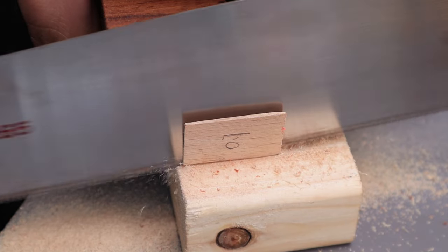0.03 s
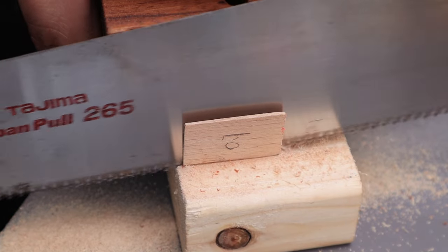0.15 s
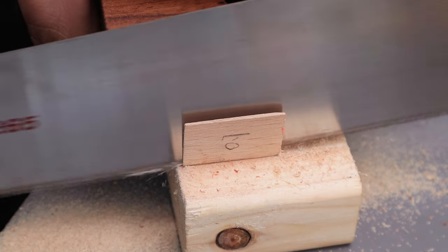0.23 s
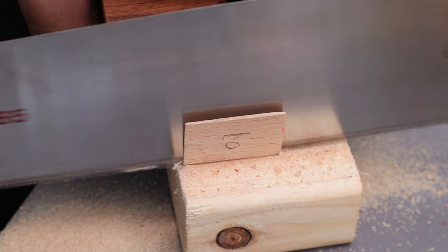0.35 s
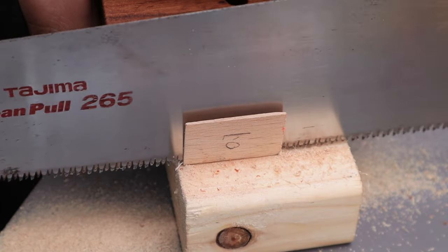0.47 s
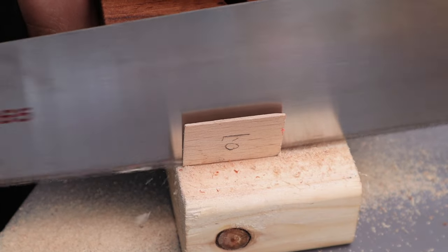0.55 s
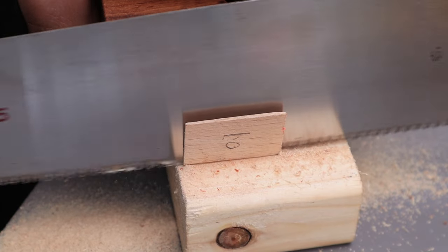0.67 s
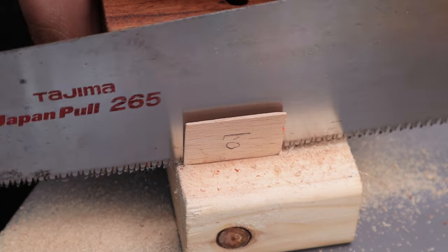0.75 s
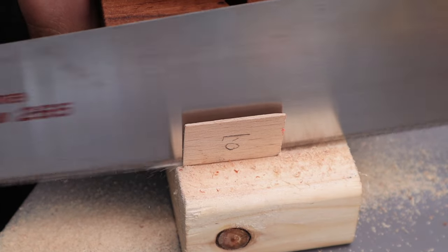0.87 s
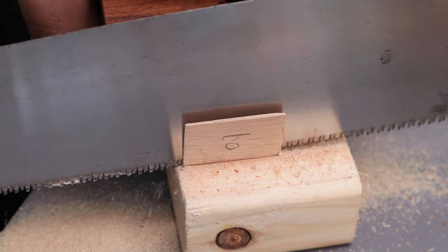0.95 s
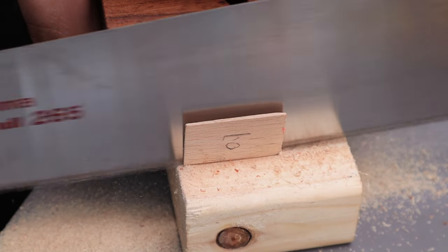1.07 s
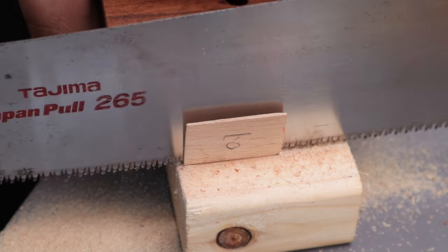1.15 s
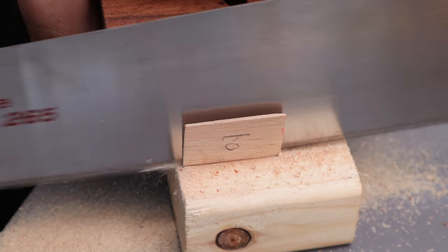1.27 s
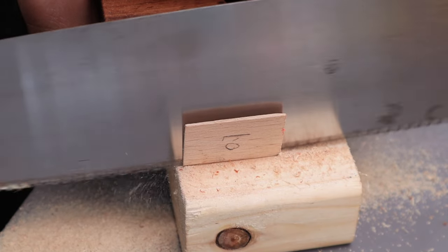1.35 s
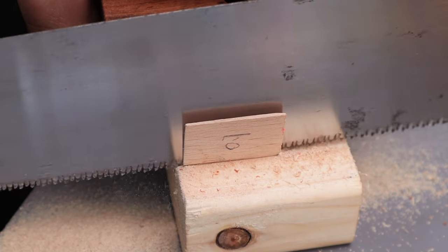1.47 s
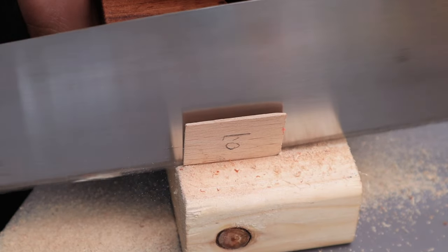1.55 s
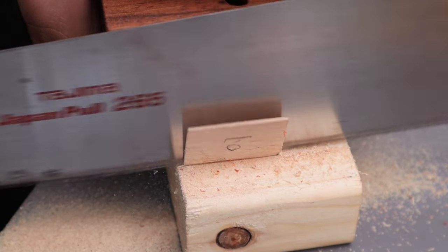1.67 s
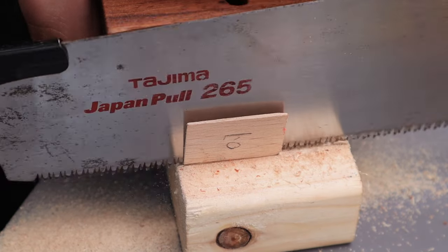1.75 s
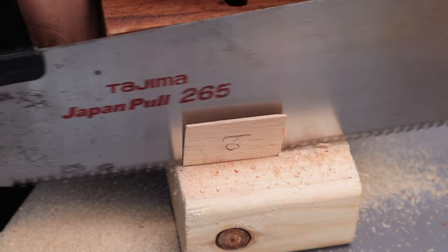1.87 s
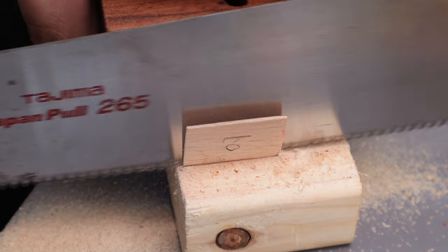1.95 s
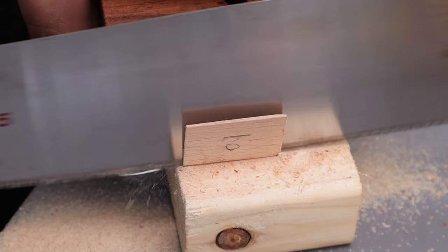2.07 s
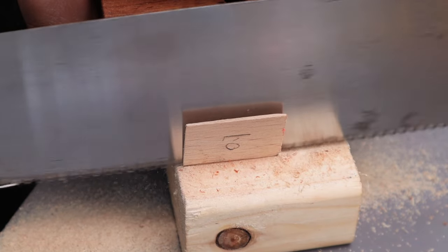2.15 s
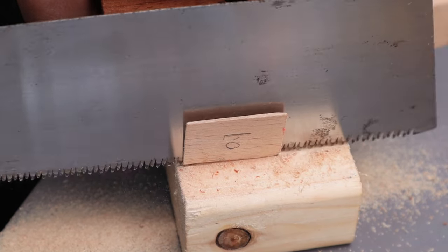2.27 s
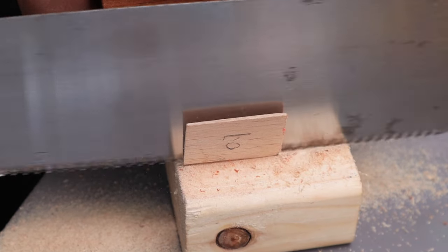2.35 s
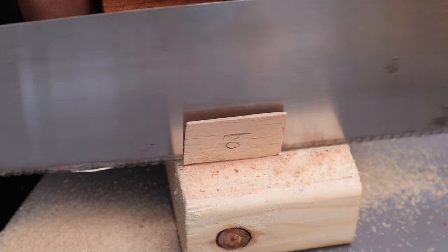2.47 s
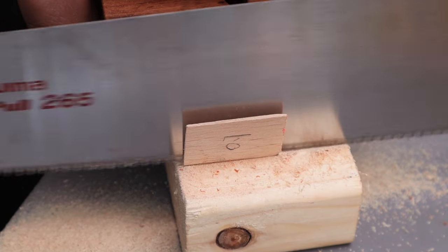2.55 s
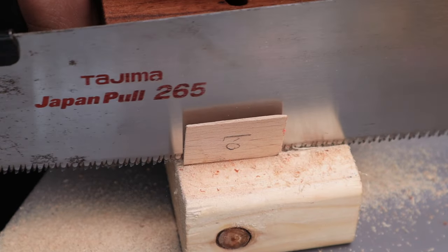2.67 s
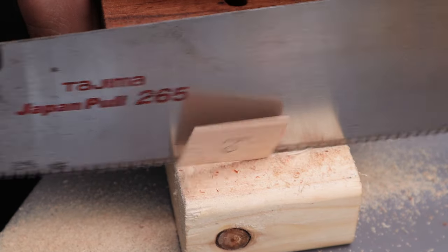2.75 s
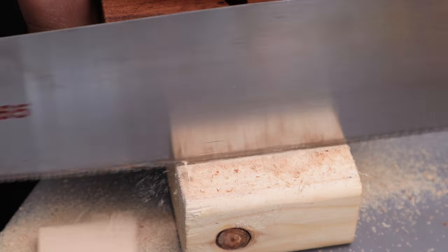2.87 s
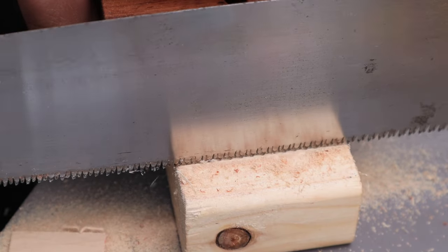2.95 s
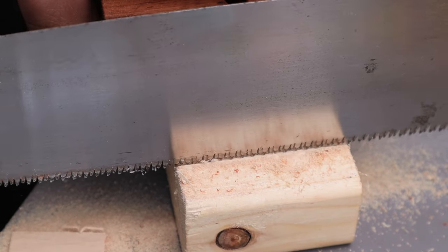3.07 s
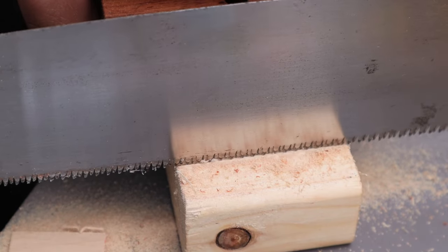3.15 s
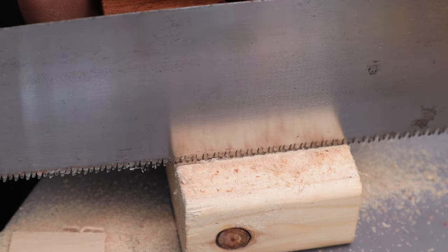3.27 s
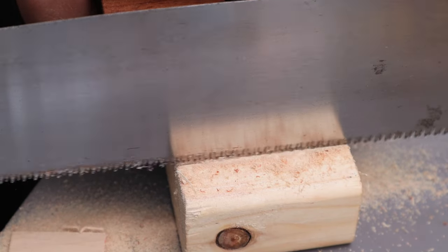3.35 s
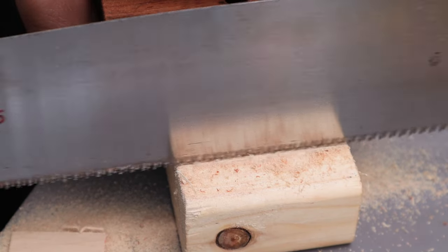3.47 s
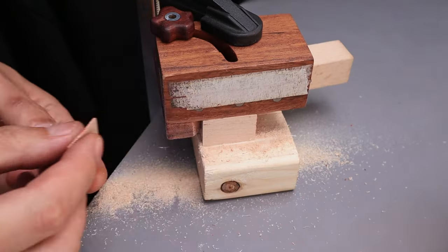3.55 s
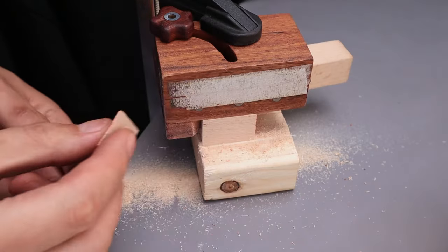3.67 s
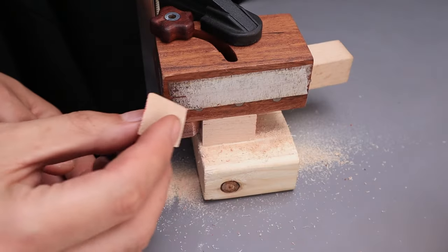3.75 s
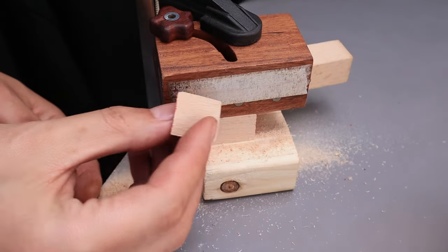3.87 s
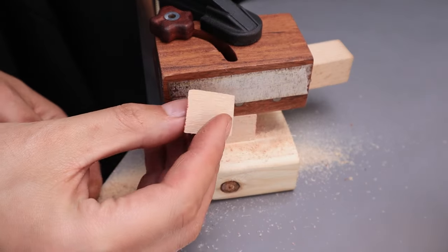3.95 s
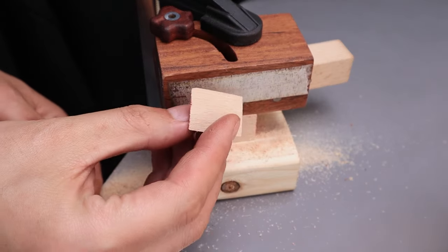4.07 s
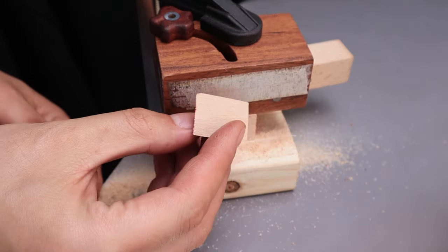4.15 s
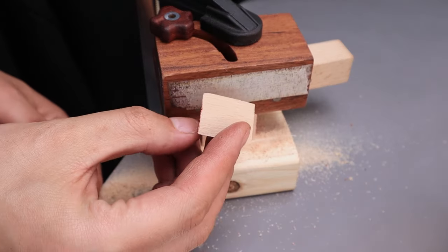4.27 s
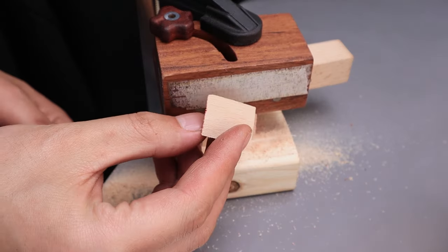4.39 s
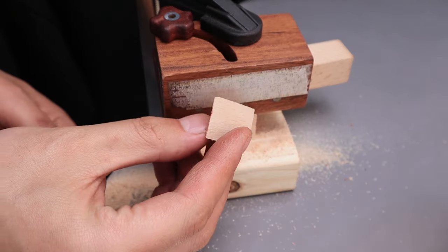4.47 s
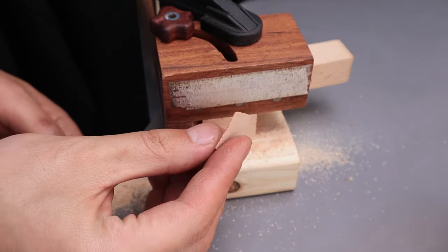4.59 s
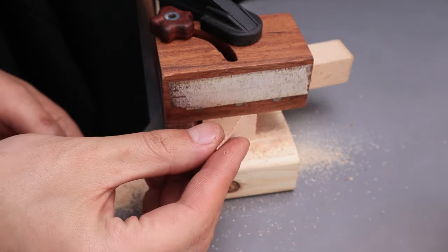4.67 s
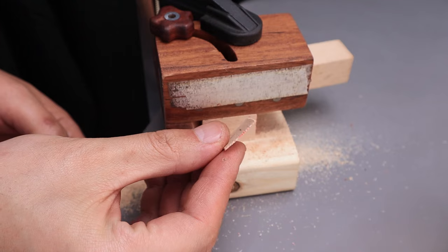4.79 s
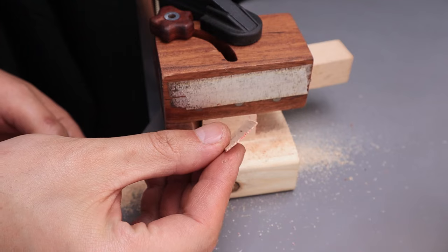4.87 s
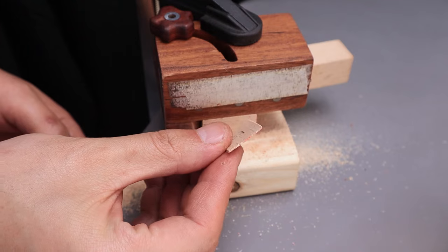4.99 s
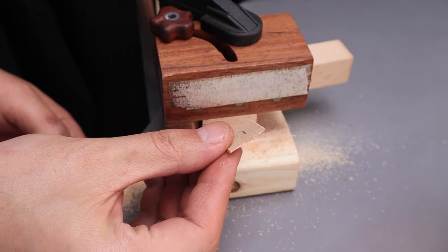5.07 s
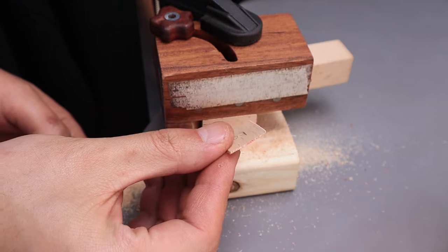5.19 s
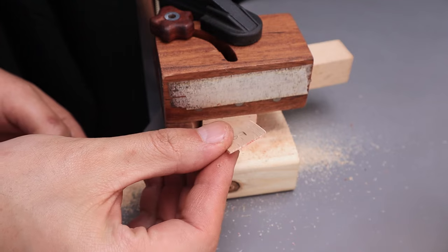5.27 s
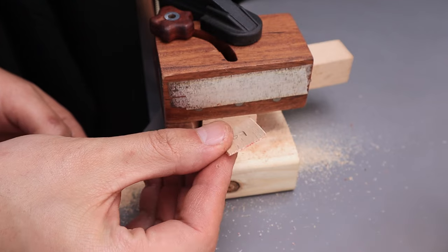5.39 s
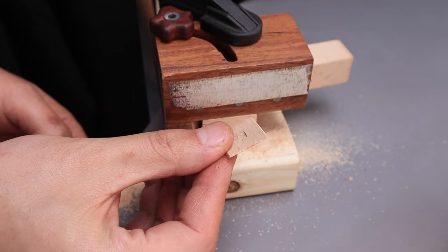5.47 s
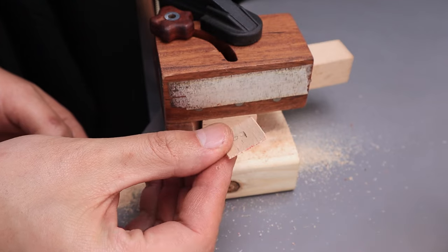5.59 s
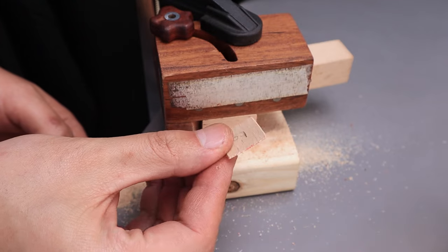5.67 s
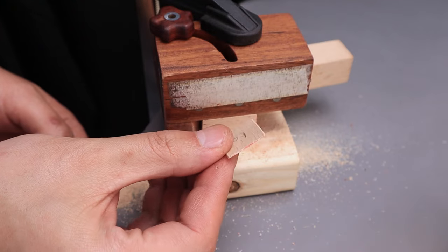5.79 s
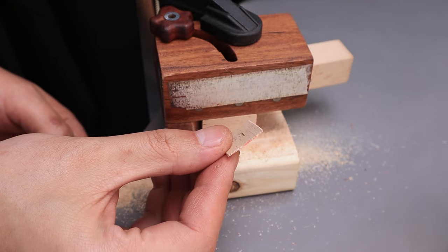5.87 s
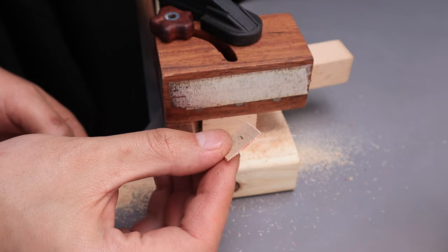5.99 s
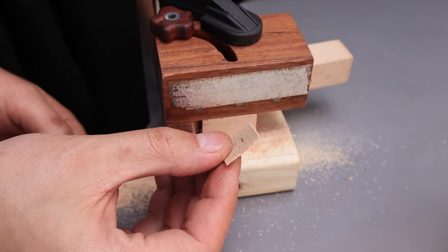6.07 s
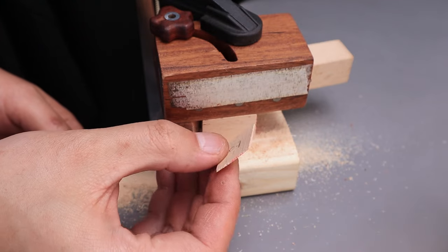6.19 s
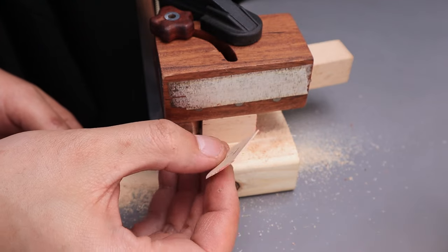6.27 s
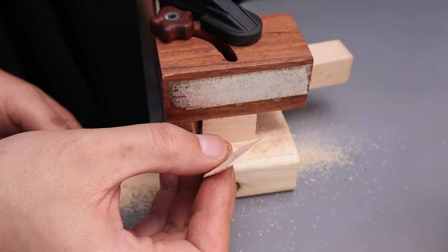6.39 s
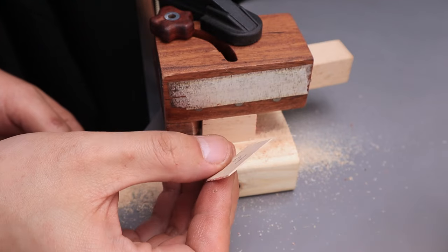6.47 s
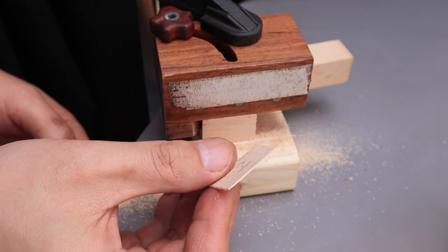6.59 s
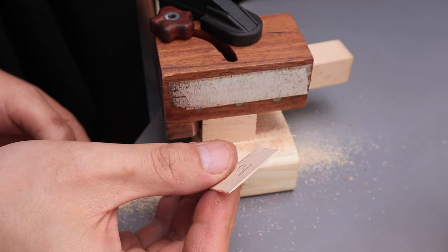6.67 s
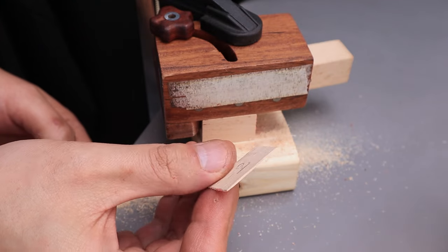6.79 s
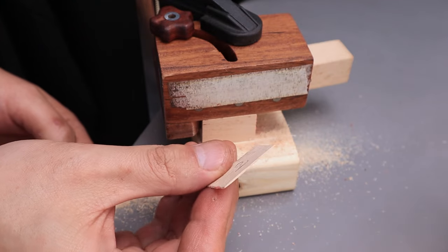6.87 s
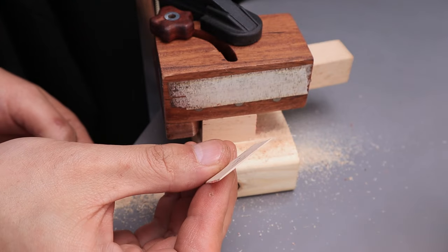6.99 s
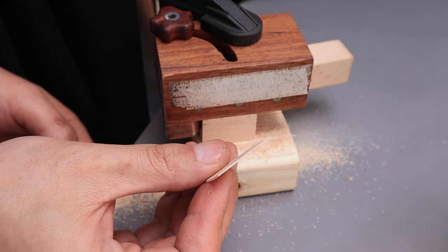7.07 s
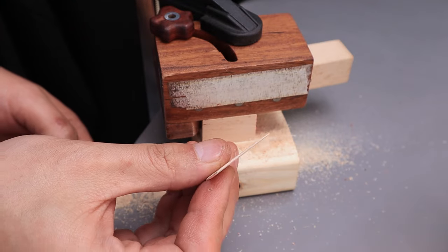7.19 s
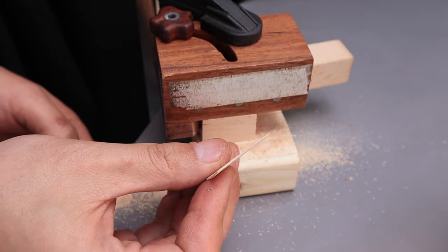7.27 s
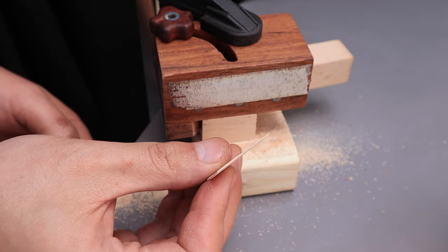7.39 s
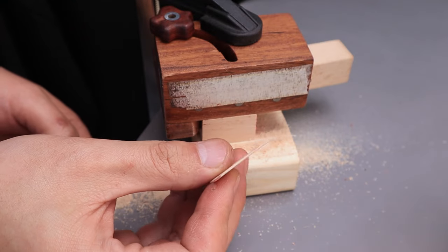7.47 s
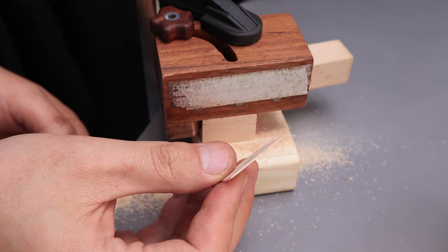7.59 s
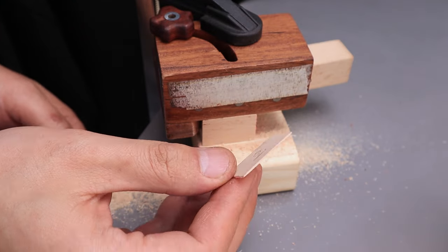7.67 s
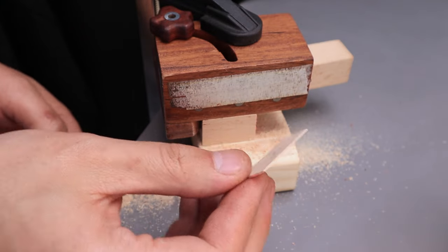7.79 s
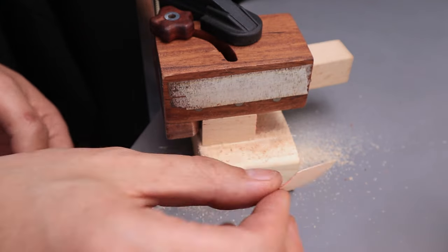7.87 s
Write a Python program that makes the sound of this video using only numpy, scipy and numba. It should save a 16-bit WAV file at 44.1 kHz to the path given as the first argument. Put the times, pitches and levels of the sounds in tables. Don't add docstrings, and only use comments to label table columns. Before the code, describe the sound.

Heard very close and dry, a fine-toothed saw works a wooden block on a bench. From 0 to 1.3 s short push and pull strokes come about six per second, each a swelling rasp with midrange woody singing, bright steel hiss and a low bench hum; a bench knock stands out near 0.5 s. From 1.3 s strokes grow longer and slower, with a sharp crack at 1.86 s. Around 2.7 and 2.9 s the blade catches with harsh, high shrieking snaps; cutting ends near 3.1 s. After a pause, a light metallic-woody tick at 3.48 s and a faint short scrape stop at 3.6 s. Then quiet room rumble and mic hiss remain, with tiny clicks and faint skin rubs on thin wood, clearest at 4.85, 6.25, 6.4 and 7.7 s. Outside, a small bird gives faint falling whistles from 3.7 to 7.3 s, with a clearer low peep at 6.26 s.

```python
import sys
import numpy as np
from scipy import signal
from scipy.fft import rfft, irfft
from scipy.io import wavfile
from scipy.ndimage import uniform_filter1d
from numba import njit

SR = 44100
rng = np.random.default_rng(int(sys.argv[2]) if len(sys.argv) > 2 else 0)


def undo_db(level):
    steps = np.asarray(level, float) / 20
    return 10 ** steps


def int16_out(signal):
    q = np.round(np.clip(np.atleast_2d(signal).T, -1, 1) * 32767)
    wavfile.write(sys.argv[1], SR, q.astype(np.int16))


N = 350154
TIME = np.arange(N) / SR


def level(x, db):
    return x * undo_db(db) / np.sqrt(np.mean(x ** 2))


@njit
def svf(x, hz, width):
    y, b, l = np.empty(len(x)), 0., 0.
    g, k = np.tan(np.pi * hz / SR), width / hz
    for i in range(len(x)):
        v = (b + g * (x[i] - l)) / (1 + g * (g + k))
        b, l, y[i] = 2 * v - b, l + 2 * g * v, k * v
    return y


def svf_twice(x, hz, width):
    return svf(svf(x, 1. * hz, 1. * width), 1. * hz, 2. * width)


def walk(rate_hz, size=N):
    hold = int(SR / rate_hz)
    steps = np.repeat(rng.standard_normal(size // hold + 1), hold)
    return uniform_filter1d(steps, hold)[:size]


def ring(x, modes, shift_db):
    out = np.zeros(len(x))
    for k, (hz, width_hz, db) in enumerate(modes):
        gain = undo_db(db + shift_db * walk(36, size=len(x)))
        out += (-1) ** k * gain * svf(x, 1. * hz, 1. * width_hz)
    return out


def colour(x, points):
    size = 4096
    hz, db = np.transpose(points)
    bin_hz = np.fft.rfftfreq(size, 1 / SR)
    log_gain = np.interp(np.log(bin_hz + 1), np.log(hz), db) * np.log(10) / 20
    fold = np.r_[1, 2 * np.ones(size // 2 - 1), np.zeros(size // 2)]
    response = irfft(np.exp(rfft(irfft(log_gain) * fold)))
    return signal.fftconvolve(x, response)[:len(x)]


def tearing(scatter_db, patchy_db, rate_hz, size=N):
    scatter = scatter_db * rng.exponential(size=size)
    return rng.standard_normal(size) * undo_db(scatter + patchy_db * walk(rate_hz, size=size))


def echo(x, t60_s, wet_db):
    t = TIME[:SR // 2]
    tail = rng.standard_normal(len(t)) * undo_db(-60 * t / t60_s)
    return x + signal.fftconvolve(x, level(tail, wet_db) / np.sqrt(len(t)))[:N]


def bumps(t, rows):
    return sum(db * np.exp(-((t - s) / length_s) ** 2) for s, length_s, db in rows)


# [Hz, dB per Hz]
AIR_SPECTRUM = [(18, -30), (34, -3), (56, -9), (71, -16), (450, -31.5), (800, -29.5), (1500, -40.5),
                (16200, -41)]
AIR_DB = -63.5


def air():
    still = level(colour(rng.standard_normal(N), AIR_SPECTRUM), AIR_DB)
    rumble = svf(still, 40., 60.)
    street = svf(still, 850., 400.) * 0.26 * undo_db(2.2 * walk(10))
    return still + street + rumble * (undo_db(3 * walk(3)) - 1)


# t/s, length/s, from f/Hz, to f/Hz, level/dB
BIRD_SLIDES = [(3.74, 0.05, 7960, 7260, -78.5), (4.191, 0.13, 8050, 6570, -79.5),
               (4.681, .125, 7920, 5970, -77), (5.151, 0.13, 7710, 5540, -78), (4.76, .07, 6800, 5200, -80),
               (5.22, .06, 5800, 5100, -79), (4.25, .06, 7400, 6300, -79), (5.756, 0.11, 7400, 5640, -80),
               (6.61, .11, 7870, 7000, -79.5), (6.707, .065, 6500, 6190, -76),
               (6.981, 0.14, 8330, 9010, -87), (7.13, .12, 8300, 7730, -81)]
# t/s, level/dB
BIRD_PEEPS = [(3.875, -75), (4.299, -69), (5.25, -67), (5.86, -73.5), (6.261, -64)]
PEEP_S, PEEP_FROM_HZ, PEEP_TO_HZ = 0.075, 4520, 4300
BEND = 1.6


def bird():
    out, warble = np.zeros(N), walk(350)
    peeps = [(s, PEEP_S, PEEP_FROM_HZ, PEEP_TO_HZ, db) for s, db in BIRD_PEEPS]
    for start, length_s, from_hz, to_hz, db in BIRD_SLIDES + peeps:
        near = slice(int(start * SR), int((start + length_s) * SR))
        part = np.clip((TIME[near] - start) / length_s, 0, 1)
        glide_hz = from_hz + (to_hz - from_hz) * part ** BEND
        phase = 2 * np.pi * np.cumsum(glide_hz * (1 + 0.034 * warble[near])) / SR
        out[near] += undo_db(db) * np.abs(np.sin(np.pi * part)) ** .5 * np.sin(phase)
    return echo(out, t60_s=0.21, wet_db=5.5)


# t/s, peak level/dB, f/Hz, width/Hz, t60/s
TICKS = [(1.96, -54, 8210, 120, 0.18), (3.656, -45, 1373, 1392, 0.015), (3.77, -50.5, 1500, 1350, 0.013),
         (4.489, -52, 9000, 9000, 0.0069), (5.724, -47, 9015, 9000, 0.0065), (6.109, -51, 150, 200, 0.22),
         (6.108, -47.5, 310, 300, 0.15), (6.108, -62.5, 900, 580, 0.077), (6.245, -63.5, 1740, 350, 0.074),
         (6.108, -58, 4020, 2510, .015), (6.385, -60.5, 1560, 140, 0.17), (6.403, -55, 1580, 250, 0.073),
         (7.385, -55, 130, 144, .15), (7.385, -53.5, 730, 400, .1), (7.402, -56.5, 670, 398, 0.076),
         (3.66, -45.5, 910, 1500, 0.02), (2.428, -43, 2000, 3030, .012), (3.484, -43, 1100, 86, 0.053),
         (3.484, -37, 1810, 140, 0.071), (3.483, -34.5, 2422, 280, .03)]
# t/s, peak level/dB, f/Hz
BENCH_JOLTS = [(.17, -27.5, 545), (.845, -24.5, 680), (.99, -24, 135), (1.185, -25, 669), (1.189, -28, 126),
               (1.745, -27, 1041), (2.05, -36, 110.2), (2.2, -29.5, 1110), (2.54, -25.5, 384),
               (2.3, -25, 379.2), (.525, -14.5, 265), (0.591, -26.5, 194), (0.679, -24, 121),
               (.70, -24.5, 390), (1.066, -26.5, 392.8), (1.45, -21, 340), (1.66, -20.5, 381),
               (1.82, -23.5, 115), (1.86, -22.5, 195), (2.69, -21.5, 380), (2.76, -29.5, 999.3),
               (3.019, -23.5, 389.5), (1.31, -30.5, 50)]
JOLT_WIDTH_HZ, JOLT_T60_S = 27, 0.2


def ticks():
    out, t = np.zeros(N), TIME[:SR // 4]
    jolts = [(*jolt, JOLT_WIDTH_HZ, JOLT_T60_S) for jolt in BENCH_JOLTS]
    for s, db, hz, width_hz, t60_s in TICKS + jolts:
        burst = rng.standard_normal(len(t)) * undo_db(-60 * t / t60_s)
        hit = svf_twice(burst, hz, width_hz)
        out[int(s * SR):][:len(t)] += undo_db(db) * hit / np.abs(hit).max()
    return out


# f/Hz, width/Hz
SLICE_MODES = [(13650, 1000), (10300, 610), (7350, 300)]
# f/Hz, width/Hz
PINCHED_MODE = (13150, 350)
# peak t/s, rise/s, fall/s, top mode level/dB, step down per lower mode/dB
SQUEAKS = [(4.85, .024, 0.087, -59, 20), (5.07, 0.043, .04, -74, 15), (5.21, 0.016, .014, -71, 17.5),
           (6.25, 0.03, 0.057, -79, -8), (6.261, 0.0026, 0.0055, -47, -1), (6.4, 0.022, 0.024, -45, 5.5),
           (6.543, .016, .014, -54, 23), (7.637, .0032, .003, -44.5, 22.5), (7.64, 0.018, .047, -61, 23),
           (7.735, 0.02, 0.039, -82.5, -12.5), (7.94, 0.023, .012, -57.5, 5)]
# peak t/s, rise/s, fall/s, level/dB, f/Hz
EDGE_SLIPS = [(3.648, .016, 0.024, -58.5, 11970), (3.656, 0.035, 0.0088, -50, 10380),
              (3.841, 0.0031, 0.01, -62, 8896), (3.843, .003, .008, -63, 14000),
              (4.51, .0032, .0055, -61.5, 11940), (5.163, .002, .006, -57.5, 13000),
              (5.333, .003, .006, -62.5, 12880), (7.735, 0.016, .039, -36, 14100),
              (7.74, 0.017, .024, -55, 6950), (7.78, 0.021, .04, -49.5, 14130)]
# peak t/s, rise/s, fall/s, level/dB, f/Hz
FACE_BRUSHES = [(3.61, .004, .012, -60, 3500), (3.64, .015, .015, -62, 1300),
                (7.75, .025, 0.051, -73, 4300), (6.3, .06, .1, -70, 11000), (4.9, .05, .05, -75, 8000),
                (5.05, .05, .05, -72, 12500), (7.397, .016, .016, -68, 8000),
                (3.478, 0.012, .004, -54, 7000), (3.65, 0.022, .012, -68, 5970),
                (3.69, 0.022, 0.045, -67, 10980), (3.8, 0.041, 0.029, -69, 9900),
                (3.89, .054, .033, -69.5, 10760), (4.131, 0.019, .02, -70, 11500),
                (4.84, 0.0066, 0.073, -61, 11300), (6.253, 0.014, .011, -53.5, 12370),
                (6.4, .02, .02, -56.5, 10100), (6.542, .01, .012, -63.5, 9050),
                (7.395, .014, 0.016, -69, 2790), (7.395, 0.014, .016, -68, 5020),
                (7.398, 0.016, 0.017, -63, 12470), (7.638, 0.0034, .011, -62, 7500),
                (7.76, 0.034, 0.055, -61, 8100)]
SLIP_WIDTH, BRUSH_WIDTH = .12, .65


def fingers():
    grit = tearing(scatter_db=2.5, patchy_db=2.5, rate_hz=140)
    rubs = []
    for s, rise_s, fall_s, db, step_db in SQUEAKS:
        modes = SLICE_MODES if s > 6 else [PINCHED_MODE] + SLICE_MODES[1:]
        for k, (hz, width_hz) in enumerate(modes):
            rubs.append((s, rise_s, fall_s, db - k * step_db, hz, width_hz))
    rubs += [(*row, SLIP_WIDTH * row[-1]) for row in EDGE_SLIPS]
    rubs += [(*row, BRUSH_WIDTH * row[-1]) for row in FACE_BRUSHES]
    out = np.zeros(N)
    for s, rise_s, fall_s, db, hz, width_hz in rubs:
        near = slice(int((s - 3 * rise_s) * SR), int((s + 3 * fall_s) * SR))
        t = TIME[near] - s
        swell = np.exp(-(t / np.where(t < 0, rise_s, fall_s)) ** 2)
        out[near] += level(svf_twice(grit[near], hz, width_hz), db) * swell
    return out


# t/s, wood peak level/dB, steel peak level/dB, steel f/Hz
SNAGS = [(0.129, -26, -22, 11000), (0.329, -22, -17, 11000), (0.498, -20, -17, 11000),
         (0.667, -19, -13, 11000), (0.832, -16, -9, 12500), (0.978, -17, -9, 12500),
         (1.158, -19, -16, 11000), (1.376, -18, -12, 12000), (1.64, -24, -22, 11000),
         (1.857, -10, -4, 10500), (1.883, -32, -22, 13000), (1.989, -30, -20, 12500),
         (1.999, -24, -14, 12000), (2.429, -39, -36, 13000), (2.457, -48, -35, 12800),
         (2.478, -36, -32, 12500), (0.642, -36, -32, 9000), (0.959, -24, -20, 11000),
         (1.617, -36, -32, 9000), (2.687, -15, -7, 11500), (2.692, -17, -11, 11500),
         (2.719, -18, -5, 12500), (2.877, -36, -32, 10500), (2.894, -24, -16, 11000),
         (2.9, -28, -15, 12500), (2.903, -28, -13, 12500), (2.907, -17, -20, 12000),
         (2.909, -20, -3, 12300), (2.913, -22, -9, 12500), (2.926, -22, -11, 12000),
         (3.482, -19.5, -25, 9500)]
# f/Hz, width/Hz, level/dB
SNAG_WOOD = [(1900, 600, 0), (3800, 900, -3), (6500, 2500, -9)]
# f/Hz, level/dB, t60/s
FREE_BLADE_RING = [(1900, 0.27, 0.025), (4062, 0, 0.11), (5800, -6.5, 0.09), (6408, -14.5, 0.073),
                   (7000, -8, 0.022), (8400, -5.5, 0.041), (8660, -5, 0.036), (11105, -15, 0.03)]
CRACK_T60_S, FREE_CRACK_T60_S, STEEL_WIDTH_HZ = .006, .017, 5000
SAW_STOPS_S = 3.604


def snags():
    out, t = np.zeros(N), TIME[:SR // 10]
    free_ring = FREE_BLADE_RING + [(1160, -4, 0.069), (3361, -3.5, 0.059)]
    for s, wood_db, steel_db, steel_hz in SNAGS:
        noise = rng.standard_normal(len(t))
        if s > SAW_STOPS_S - .2:
            crack = noise * undo_db(-60 * t / FREE_CRACK_T60_S)
            body = sum(undo_db(db) * svf(crack, 1. * hz, 3.8 / t60_s) for hz, db, t60_s in free_ring)
            body = body + 0.21 * svf(svf(crack, 5000., 8000.), 3300., 7000.)
            body = body - .9 * svf(body, 600., 900.)
        else:
            crack = noise * undo_db(-60 * t / CRACK_T60_S)
            body = sum(undo_db(db) * svf_twice(crack, hz, width_hz) for hz, width_hz, db in SNAG_WOOD)
            body = np.roll(body, 30)
        steel = svf(crack, 1. * steel_hz, 1. * STEEL_WIDTH_HZ)
        hit = undo_db(wood_db) * body / np.abs(body).max() + undo_db(steel_db) * steel / np.abs(steel).max()
        out[int(s * SR):][:len(t)] += hit
    return out


# start t/s, hardest t/s, end t/s, block level/dB, roundness of swell
STROKES = [(-.09, -0.017, 0.083, -22, 1.52), (0.097, 0.196, 0.29, -21.5, 3.03),
           (0.294, 0.371, 0.46, -23, 2.1), (0.463, 0.534, 0.62, -21.5, 4.1), (0.629, 0.694, 0.8, -22, 4.5),
           (0.792, 0.849, 0.93, -20, 3.17), (0.949, 1.036, 1.102, -22, 1.42),
           (1.128, 1.195, 1.299, -20, 3.3), (1.34, 1.441, 1.591, -22.5, 1.62),
           (1.611, 1.759, 1.9104, -21.5, 1.6), (1.965, 2.244, 2.395, -24.5, 1.39),
           (2.463, 2.703, 2.84, -26.5, 1.32), (2.871, 2.975, 3.13, -24.5, 1.66),
           (3.474, 3.579, 3.68, -43.5, 0.8)]
TURN_S = 0.0057


def stroke_index(t):
    return np.clip(np.searchsorted(np.array(STROKES)[:, 0], t) - 1, 0, None)


def stroke(t, values):
    held = np.array(values, float)[stroke_index(t)]
    return uniform_filter1d(held, int(TURN_S * SR), axis=0)


# full-speed teeth f/Hz, regular share/dB, then scrape, blade, bench level/dB re block
BITES = [(221.8, -9.5, -4, 3.5, -3.5), (265, 0, -7, 1, -0.5), (259.1, -8.5, -7, 1, -5),
         (264.8, -3, -5.5, 0, -0.5), (258.1, -9, -5.5, 2.5, -3.5), (274.2, -2, -5.5, 2, -4),
         (388, -7.5, -4, 2.5, -5.5), (330, -9, -6.5, -0.3, -1.5), (329, -5.5, -6.5, 1.5, -6.5),
         (270.7, 8.5, -6.5, 2, -1.5), (373.6, -1, -6.5, 1, -6.5), (195, 12, -7, 1, -6.5),
         (380, -3, -6, -2.5, -12), (300, -21.5, -8.5, -3, -19)]
# t/s, length/s, level/dB
SURGES = [(0.18, .015, 2), (0.56, 0.017, 1), (0.851, .015, 0.8), (1.199, 0.011, 2.5), (1.402, 0.022, 2),
          (1.758, 0.012, 1.5), (2.082, 0.068, -2), (2.18, 0.021, 0.5), (2.284, 0.035, 1), (2.555, 0.027, 2),
          (2.78, .03, -1), (2.98, .03, 0.4), (3.507, .014, -3.5), (3.536, 0.013, 1.5), (3.593, .01, 1.5)]
# t/s, length/s, level/dB
FLARES = [
    (1.396, .03, 2.5),
    (1.784, .025, 4),
    (1.888, .004, 2),
    (2.0, .006, 4.5),
    (2.287, .04, 2.5),
    (2.69, 0.0073, 7),
    (2.72, 0.015, 12.5),
    (2.908, .018, 9),
]
BLADE_LEAN_DB = (-4, 2.5)
BENCH_LEAN_DB = (-3, 10.5)
# after-ring level/dB, time constant/s, first-catch level/dB
LINGER = [
    (-11.5, 0.019, -14),
    (-18, .021, -16.5),
    (-21.5, 0.01, -12.5),
    (-5.5, 0.036, -13),
]
FASTEST_LATE = (1.6, 1.01)
SLOWEST = (.6, .72)
KERF_DB = [0.5, -0.5, -2, 1.5, -1, -0.3, 2.5, -2.5, 0, -0.85, -1.5, 0, -0.94, 1]
DEEP_DB = [-11, -9, -8, -8.5, -9, -6, -8, -7, -7.5, -8, -5, -6, -4, -0.5]
CATCH_S, CREEP_DB = 0.021, -37.5
EVEN_LOSS_DB = 42


def effort(t):
    k, turn = stroke_index(t), int(TURN_S * SR)
    start, hardest, end, db, roundness = np.array(STROKES)[k].T
    teeth_hz, even_db, scrape_db, blade_db, bench_db = np.array(BITES)[k].T
    db = db + bumps(t, SURGES)

    before, after = (t - start) / (hardest - start), 1 + (t - hardest) / (end - hardest)
    part = np.clip(np.where(t < hardest, before, after) / 2, 0, 1)
    swell = np.abs(np.sin(np.pi * part)) ** roundness
    catch = (t < hardest) * (1 - swell) * (1 - np.exp(-((t - start) / CATCH_S) ** 2))
    swell = swell + undo_db(CREEP_DB - 260 * np.clip(t - STROKES[-2][2], 0, .3))

    late = part ** np.take(FASTEST_LATE, k % 2)
    speed = np.abs(np.sin(np.pi * late))
    slowest = np.where(late < .5, *SLOWEST)
    hz = uniform_filter1d(teeth_hz * (slowest + (1 - slowest) * speed), turn)
    even = undo_db(even_db - EVEN_LOSS_DB * (1 - speed))

    blade_db = blade_db + np.take(BLADE_LEAN_DB, k % 2) * (part - .5) + bumps(t, FLARES)
    bench_db = bench_db + np.take(BENCH_LEAN_DB, k % 2) * (part - .5)
    levels_db = []
    for body_db, (ring_db, ring_s, catch_db) in zip((0, scrape_db, blade_db, bench_db), LINGER):
        drive = uniform_filter1d(undo_db(db + body_db) * (swell + undo_db(catch_db) * catch), turn)
        keep = np.exp(-1 / (ring_s * SR))
        after_ring = np.abs(signal.lfilter([1 - keep], [1, -keep], drive))
        levels_db.append(20 * np.log10(np.abs(drive) + undo_db(ring_db) * after_ring + 1e-9))
    block_db, *others = levels_db
    return block_db, *(o - block_db for o in others), hz, even, np.take(KERF_DB, k), stroke(t, DEEP_DB)


# f/Hz, width/Hz, level/dB
BENCH_MODES = [(42, 60, -23.5), (122, 19, -11), (141, 22, -10.5), (204, 20, -4.5), (265, 10, 1),
               (328.5, 18, -3.5), (383, 36, -5), (460, 41, -16.5)]
BOOM_DB = [-4, -1, -2, -2, 2, 0, 0, 0, 0, 0, -5, -2, -1, -8]
# f/Hz, width/Hz, level/dB
DEEP_MODES = [(535, 30, -5.5), (596, 80, -5.5), (670, 30, 0), (736, 35, -4), (859, 40, -6), (957, 32, -3.5)]
# f/Hz, width/Hz, level/dB
KERF_MODES = [(1704, 94, -3.5), (1807, 110, -0.5), (1896, 110, 0.5), (2012, 94, 0), (2114, 100, -0.5),
              (2227, 160, -7.5)]
# f/Hz, width/Hz, level/dB
BLOCK_MODES = [(1070, 160, -5), (1189.4, 120, -3.5), (1313, 130, -1), (1430, 120, -3.5), (1558, 150, -4.5),
               (2610, 400, -8)]
FACE_DB = [0, 0, 0, -3, 1, 0, 0, 0, 1, 1, 1.5, 0, 0.5, 0]
# [Hz, dB per Hz]
SCRAPE_SPECTRUM = [(1530, -28.5), (2600, -3.5), (2910, -6), (4040, -2), (5470, -6.5), (8800, -5.5),
                   (11700, -32), (19800, -120)]
# [Hz, dB per Hz]
BLADE_SPECTRUM = [(4710, -47), (8200, -14), (9380, -2), (11100, -6.5), (12900, -2.5), (14600, -6),
                  (15700, -9.5), (16200, -22.5)]
# f/Hz, width/Hz, level/dB
BLADE_MODES = [(9500, 600, -10), (10100, 400, -11), (12600, 330, -4.5), (13043, 380, -7), (13700, 450, -6)]
# f/Hz, width/Hz
GRIP_MODES = [(9000, 900), (9950, 810), (11000, 800), (11900, 700), (12750, 800), (13600, 910)]
GRIP_DB = [(0, 2, -1, 2, -2, 0), (-2, 1, -3, -1, 0, -1), (1, 1, -2, -1, -4, 0), (-2, 1, -4, 1, 2, 0),
           (-1, -1, -3, 0, 0, 0), (0, 1, 0, 1, 1, 2), (0, 0, -2, 2, 1, 0), (0, 1, 0, 0, 0, 0),
           (-1, -3, -2, -1, 1, -4), (-2, -2, -4, 0, 3, -4), (-6, -3, -3, -2, 3, -4), (-4, -4, -2, 2, 3, -4),
           (-1, 0, -1, 5, -1, 0), (0, 0, 0, 0, 0, 0)]
SAW_SIZE = int(3.7 * SR)
SHAKE_DB, SHAKE_HZ, SHAKE_ENDS_S = -57, 65, 3.2


def saw():
    t = TIME[:SAW_SIZE]
    lifted = t > 3.4
    block_db, scrape_db, blade_db, bench_db, hz, even, kerf_db, deep_db = effort(t)
    phase = 2 * np.pi * np.cumsum(hz * (1 + .03 * walk(60, size=SAW_SIZE))) / SR
    bite = 1 + 0.087 * np.clip(even, 0, 1) * np.cos(phase)
    fibres = bite * tearing(scatter_db=2.5, patchy_db=-1.5, rate_hz=150, size=SAW_SIZE)

    push = even * (np.cos(phase) + .17 * np.cos(2 * phase)) * undo_db(2.5 * walk(40, size=SAW_SIZE))
    bench = level(ring(fibres, BENCH_MODES, shift_db=3.5), 0)
    boom = (undo_db(stroke(t, BOOM_DB)) - 1) * svf(bench, 265., 70.)
    bench = (bench + boom + undo_db(5) * push) / np.sqrt(1 + even ** 2 / 2)
    deep = level(ring(fibres, DEEP_MODES, shift_db=3.5), 0) * undo_db(deep_db)

    sing_db = kerf_db + np.where(lifted, 3.5, 0.23 * np.clip(block_db + 25, -30, 8))
    kerf = undo_db(sing_db) * ring(fibres, KERF_MODES, shift_db=2.5)
    face = undo_db(stroke(t, FACE_DB)) * ring(fibres, BLOCK_MODES, shift_db=2.5)
    block = level(kerf + face, -2.3)

    scratch = bite * tearing(scatter_db=-0.5, patchy_db=1, rate_hz=90, size=SAW_SIZE)
    scrape = level(colour(scratch, SCRAPE_SPECTRUM), 0)

    chips = bite * tearing(scatter_db=0, patchy_db=2, rate_hz=310, size=SAW_SIZE)
    hiss = level(colour(chips, BLADE_SPECTRUM), 0)
    blade = level(hiss + level(ring(chips, BLADE_MODES, shift_db=5.5), -7.5), 0)
    for (mode_hz, width_hz), grip_db in zip(GRIP_MODES, stroke(t, GRIP_DB).T):
        blade = blade + (undo_db(grip_db) - 1) * svf(blade, 1. * mode_hz, 1. * width_hz)
    blade = np.where(lifted, level(svf(chips, 13000., 14000.), 1.5), blade)

    heard = block + undo_db(scrape_db) * scrape + undo_db(blade_db) * blade + undo_db(bench_db) * (bench + deep)
    heard = (t < SAW_STOPS_S) * undo_db(block_db) * heard
    rock = svf(svf(rng.standard_normal(SAW_SIZE), 1. * SHAKE_HZ, 70.), 1. * SHAKE_HZ, 100.)
    rock = level(rock * undo_db(3 * walk(8, size=SAW_SIZE)), SHAKE_DB)
    heard = heard + rock * np.clip((SHAKE_ENDS_S - t) / 0.087, 0, 1)
    return np.pad(heard, (0, N - SAW_SIZE))


def scene():
    near = echo(saw() + snags() + fingers() + ticks(), t60_s=0.018, wet_db=-12.5)
    near = near - 0.68 * svf(near, 14650., 1400.)
    fade = 1 - .85 * np.exp(-((TIME - 3.62) / 0.0112) ** 4)
    return np.tile(fade * (near + bird() + air()), (2, 1))


# start t/s, end t/s, low f/Hz, high f/Hz
DROPOUTS = [(.35, .42, 14400, 14850), (.53, .59, 14500, 14900), (.6, .64, 14000, 15900),
            (.7, .8, 14400, 14900), (.88, .92, 14400, 14850), (1.02, 1.07, 14100, 14900),
            (1.07, 1.12, 14050, 14250), (1.21, 1.27, 14350, 14950), (1.26, 1.33, 14000, 14550),
            (1.46, 1.55, 14650, 14850), (1.69, 1.74, 14200, 14650), (1.78, 1.9, 14600, 14850),
            (1.9, 1.96, 14500, 14900), (2.0, 2.08, 14350, 14650), (2.07, 2.13, 14200, 15000),
            (2.1, 2.14, 13600, 14300), (2.13, 2.25, 14250, 14900), (2.23, 2.27, 13700, 14300),
            (2.28, 2.35, 14600, 15000), (2.34, 2.43, 14500, 15900), (2.56, 2.63, 14600, 15000),
            (2.65, 2.76, 14400, 14750), (2.74, 2.82, 14200, 14550), (2.8, 2.86, 14600, 15000)]


def drop_bands(x):
    out, edge = x.copy(), 256
    for start, end, low_hz, high_hz in DROPOUTS:
        near = slice(int(start * SR) - edge, int(end * SR) + edge)
        size = near.stop - near.start
        hz = np.fft.rfftfreq(size, 1 / SR)
        band = irfft(rfft(out[:, near]) * ((hz > low_hz) & (hz < high_hz)), size)
        out[:, near] -= band * signal.windows.tukey(size, 4 * edge / size)
    return out


def top_cut(x):
    return signal.sosfilt(signal.butter(12, 15830, fs=SR, output="sos"), x)


def record(dry):
    mix = drop_bands(dry)
    return top_cut(mix)


dry = scene()
out = record(dry)
int16_out(out)
```